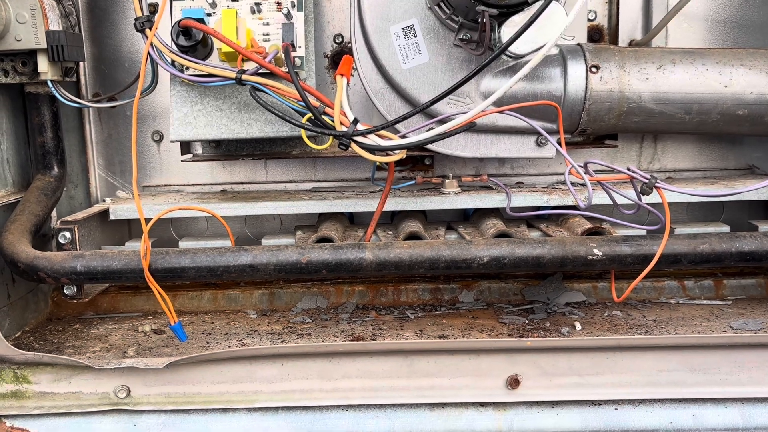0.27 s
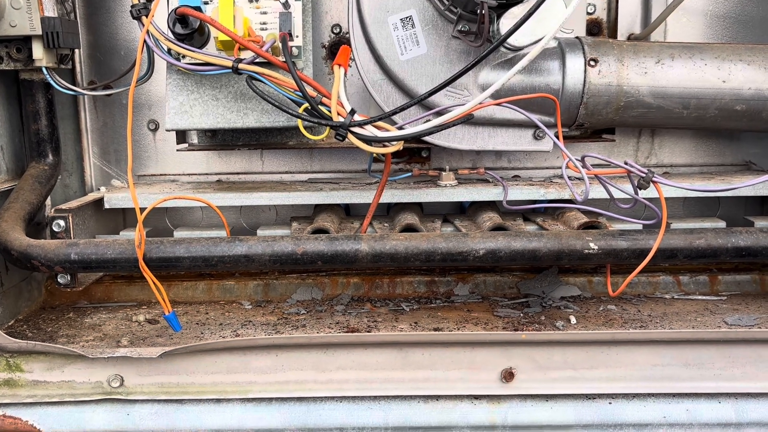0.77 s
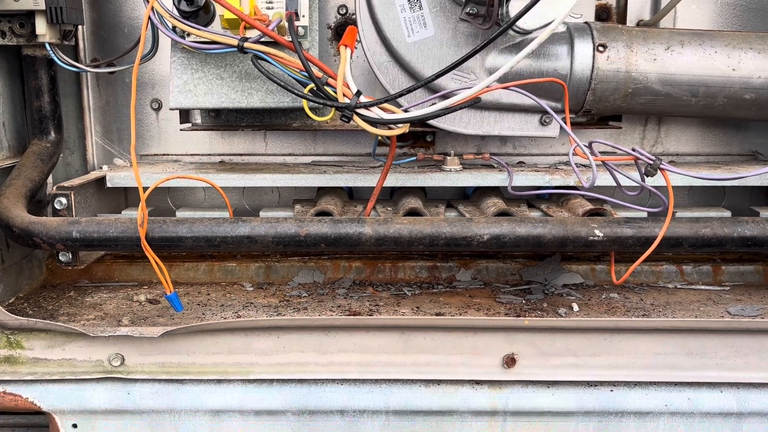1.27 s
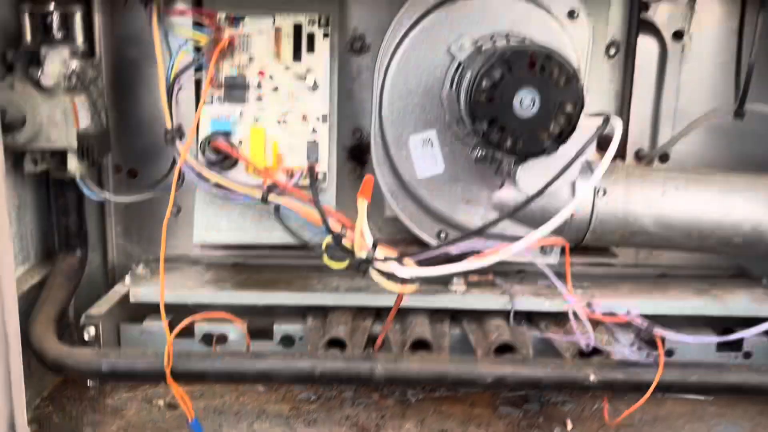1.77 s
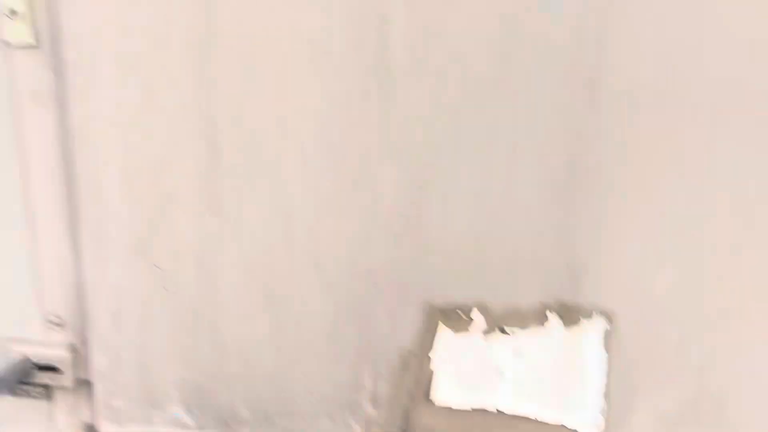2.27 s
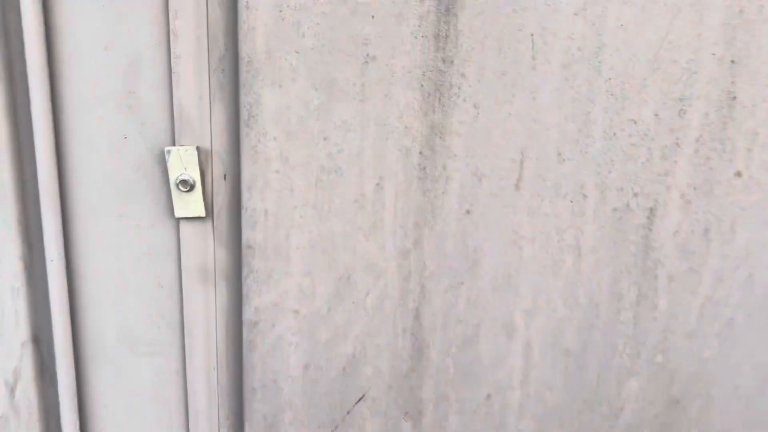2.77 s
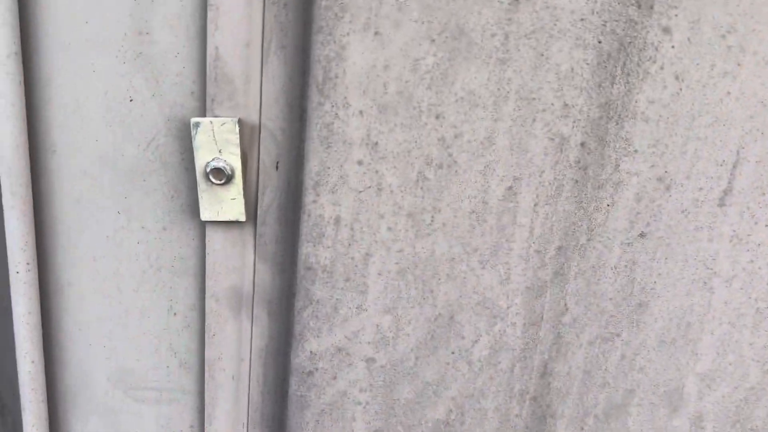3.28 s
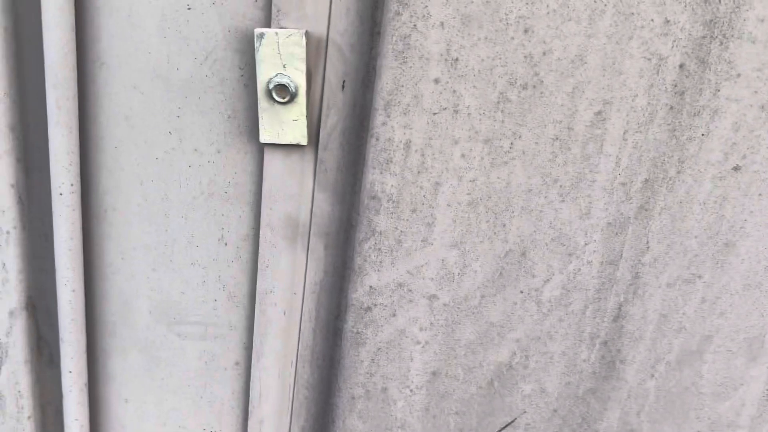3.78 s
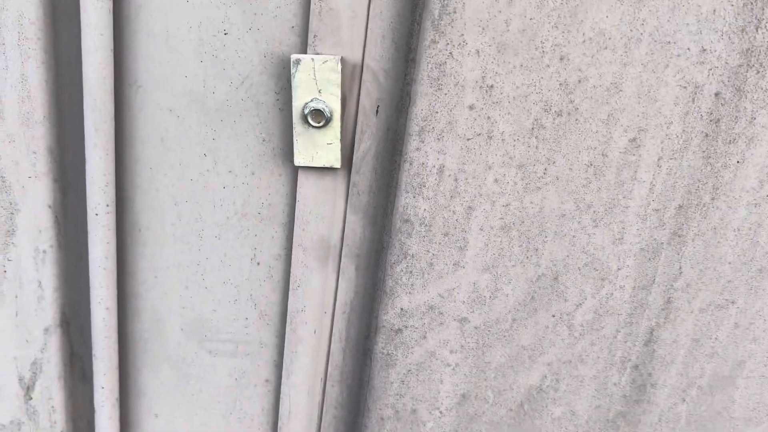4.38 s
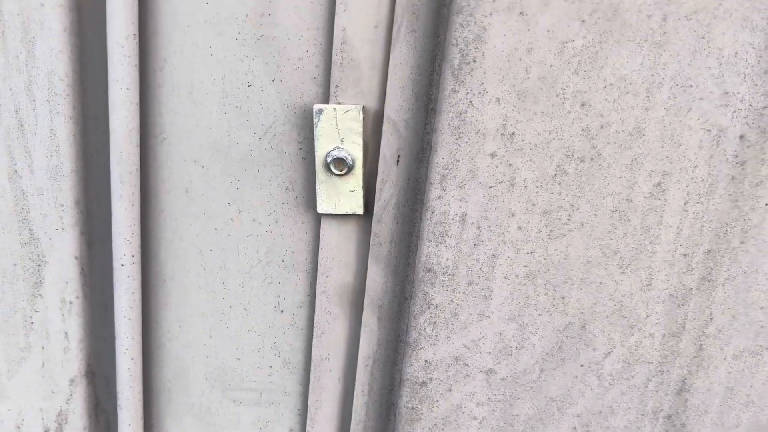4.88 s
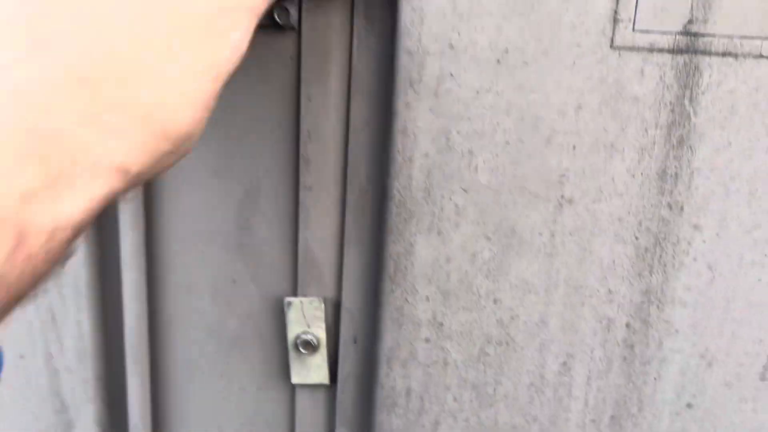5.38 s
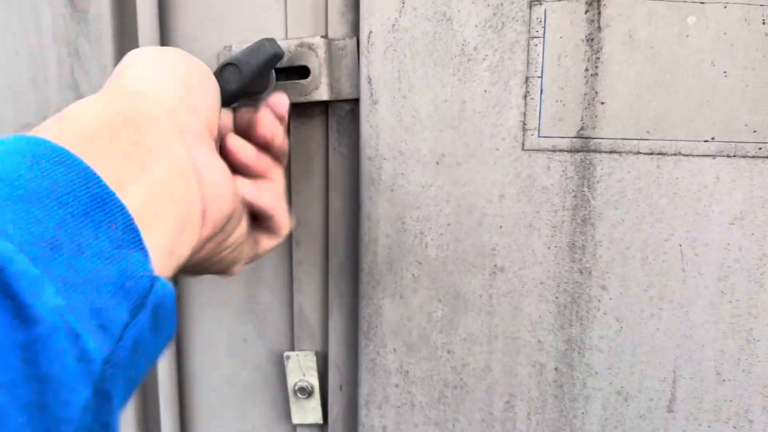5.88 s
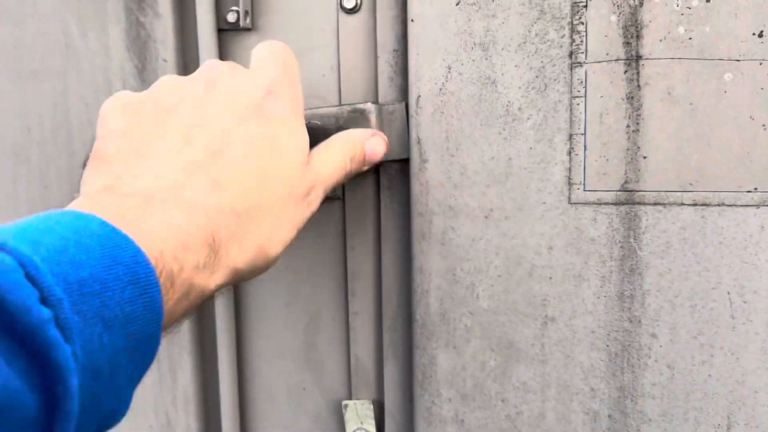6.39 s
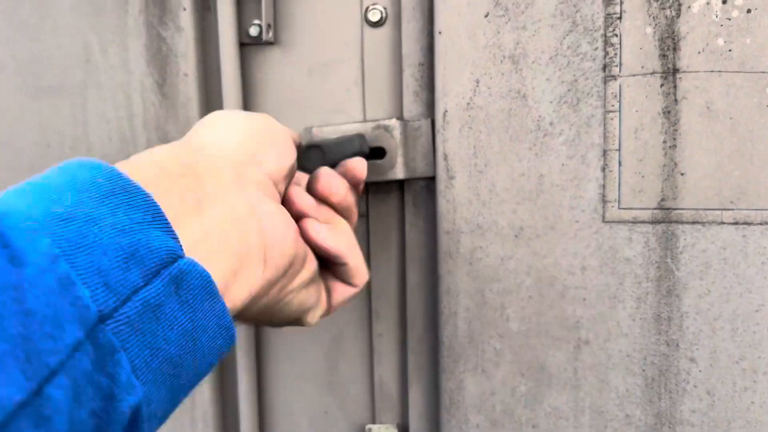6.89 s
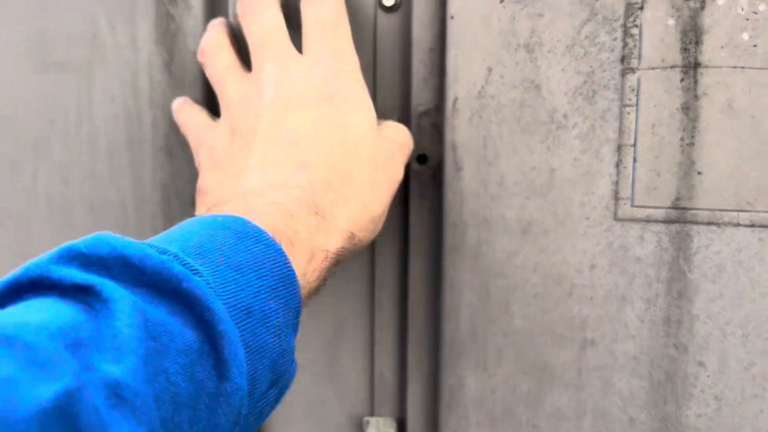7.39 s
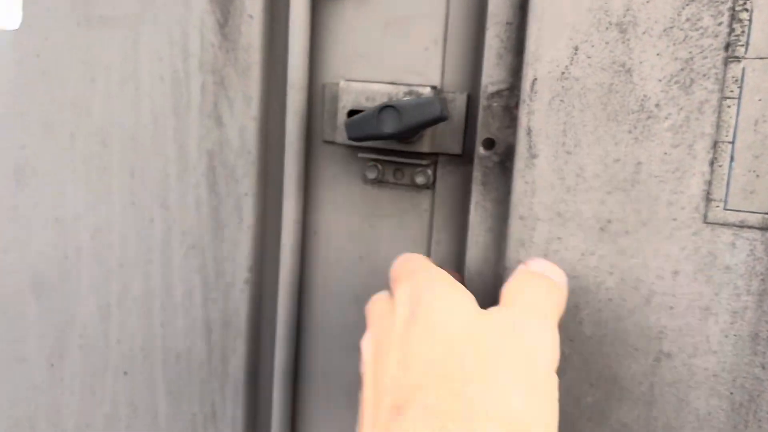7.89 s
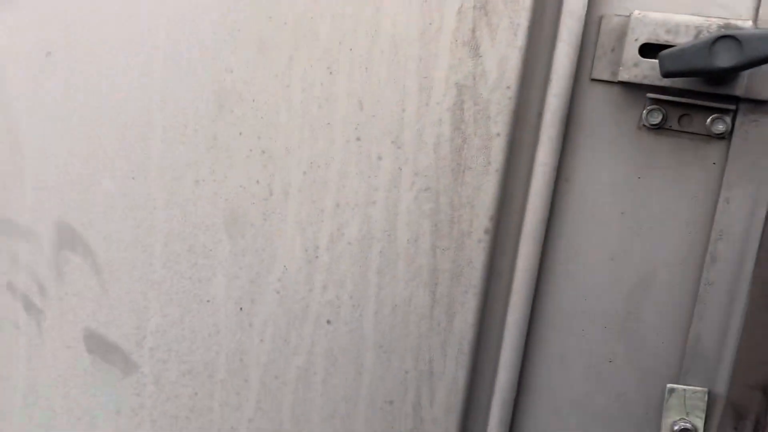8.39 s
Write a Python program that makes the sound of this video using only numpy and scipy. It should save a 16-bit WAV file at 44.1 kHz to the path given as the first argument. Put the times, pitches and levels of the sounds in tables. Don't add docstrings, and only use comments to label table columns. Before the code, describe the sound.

A gas furnace rumbles and roars steadily while a hand works a metal panel latch, with sharp clacks, small squeaks and hollow sheet-metal booms.

```python
import sys
import numpy as np
from scipy import signal
from scipy.fft import rfft, irfft, next_fast_len
from scipy.io import wavfile
from scipy.ndimage import uniform_filter1d, map_coordinates

SR = 44100
rng = np.random.default_rng(int(sys.argv[2]) if len(sys.argv) > 2 else 0)


def dump(signal):
    limited = np.clip(np.atleast_2d(signal).T, -1, 1)
    pcm = np.round(limited * 32767).astype(np.int16)
    wavfile.write(sys.argv[1], SR, pcm)


def natural_amplitude(level_db):
    exponent = np.asarray(level_db, float) / 20
    return 10 ** exponent


N = 381024


def unit(x):
    return x / np.sqrt(np.mean(x ** 2) + 1e-20)


def along(points, hz):
    point_hz, value = np.transpose(points)
    return np.interp(np.log(hz + 1), np.log(point_hz + 1), value)


def wobble(knots_per_s):
    knots = rng.standard_normal(int(N * knots_per_s / SR) + 4)
    return map_coordinates(knots, [np.arange(N) * knots_per_s / SR])


def filtered(x, response):
    size = next_fast_len(x.shape[-1] + 8192)
    spectrum = rfft(x, size) * response(np.fft.rfftfreq(size, 1 / SR))
    return irfft(spectrum, size)[..., :x.shape[-1]]


def resonant(modes):
    def response(hz):
        total = 0
        for k, (centre_hz, width_hz, level_db) in enumerate(modes):
            loss = 1j * hz * width_hz
            total = total + (-1) ** k * natural_amplitude(level_db) * loss / (centre_hz ** 2 - hz ** 2 + loss)
        return total
    return response


def above_400(hz):
    return 1 / (1 + (400 / (hz + 1)) ** 4)


# centre_hz, likeness (0-1)
LIKENESS = [(60, .982), (300, .962), (700, .8), (1500, .58), (2400, .85), (4000, .83), (5500, .6),
            (6300, .95)]


def rush(response, patchy_db):
    pair = rng.standard_normal((2, N))
    if patchy_db:
        z = signal.stft(pair, nperseg=512)[2]
        field = uniform_filter1d(rng.standard_normal(z.shape[1:]), size=5, axis=0)
        field = uniform_filter1d(field, size=12, axis=1)
        pair = signal.istft(z * natural_amplitude(patchy_db * unit(field)), nperseg=512)[1][:, :N]

    def mid_side(hz):
        turn = np.arccos(np.clip(along(LIKENESS, hz), 0, 1)) / 2
        return response(hz) * [np.cos(turn), np.sin(turn)]
    mid, side = filtered(pair, mid_side)
    return unit(np.array([mid + side, mid - side]))


def add(track, start_s, sound, pan_db):
    i = round(start_s * SR)
    track[:, i:i + len(sound)] += natural_amplitude([[pan_db / 2], [-pan_db / 2]]) * sound[:N - i]


# hz, level_db (per Hz)
FLAME = [(12, -56), (20, -43), (41, -16), (59, -2.5), (108, -4.5), (125, -4.5), (146, -15), (180, -11.5),
         (230, -10.5), (400, -120)]


def flames(fire_db, flutter):
    noise = rush(lambda hz: natural_amplitude(along(FLAME, hz)), patchy_db=0)
    swell = np.sqrt(abs(uniform_filter1d((noise ** 2).mean(axis=0), size=5000)) + .05)
    full_fire_db = -15
    return natural_amplitude(full_fire_db + fire_db + .9 * flutter) * unit(noise / swell ** .45)


# centre_hz, width_hz, level_db
FLUE = [(197.4, 29.7, -1.5), (264.6, 50, -3.5), (311.2, 43.5, -4.5), (422.3, 57, -13.5), (586, 25.5, -14.5)]


def flue_roar(fire_db, far_db, flutter):
    roar_db = -22 + 0.13 * fire_db + 0.16 * far_db
    noise = rush(lambda hz: resonant(FLUE)(hz) / (1 + (hz / 800) ** 4), patchy_db=1.06)
    return natural_amplitude(roar_db + 0.37 * flutter) * noise


# centre_hz, width_hz, level_db
TUBES = [(475, 160, -1.5), (606, 32, 0), (652, 27, -1.5), (810, 79, -4), (870, 22.4, 0.5), (966, 20, -2.5),
         (1005, 21, -6.5), (1250, 97, -5), (1458, 47, -7.5), (1820, 150, -14), (2550, 300, -16),
         (4500, 200, -16)]
# centre_hz, width_hz, level_db
CASING = [(456, 27, 5), (583, 63, 0), (686, 52, -3.5), (768, 47, -6), (894, 26, -6), (1048, 42, -6.5),
          (1216, 56, -6.5), (1494, 93, -11.5), (1850, 220, -16), (2620, 200, -15)]


def cabinet(far_db, direct):
    tubes = rush(lambda hz: abs(resonant(TUBES)(hz)) ** 1.42 * above_400(hz), patchy_db=0)
    casing = rush(lambda hz: abs(resonant(CASING)(hz)) ** 1.27 * above_400(hz), patchy_db=0)
    level_db, shut_db = -31.5 + 0.64 * far_db, -4
    return natural_amplitude(level_db) * (np.sqrt(direct) * tubes + natural_amplitude(shut_db) * np.sqrt(1 - direct) * casing)


# hz, level_db (per Hz)
HISS = [(300, -25), (700, -3.5), (1500, 8.5), (2100, 5.5), (3500, 1), (5500, -2), (9000, -1.5),
        (11500, -3.5), (12500, -6.5), (14000, -14.5), (15700, -16)]


def gas_hiss(far_db):
    noise = rush(lambda hz: natural_amplitude(along(HISS, hz)), patchy_db=1.3)
    return natural_amplitude(-38.5 + far_db + 0.56 * wobble(7.3)) * noise


# centre_hz, width_hz, level_db
WHINE = [(2410, 120, -1), (2630, 93, 0)]


def fan_whine():
    turn_s, turn_lasts_s = 1.68, 0.05
    facing = 1 / (1 + np.exp(np.clip((np.arange(N) / SR - turn_s) / turn_lasts_s, -50, 50)))
    return natural_amplitude(-48.5) * facing * rush(lambda hz: abs(resonant(WHINE)(hz)) ** 2, patchy_db=2)


# time_s, cabinet_distance_m, direct_share (0-1)
STANCE = [(0, 0.97, 1), (1.7, 0.89, 0.83), (2.05, 0.97, 0.35), (2.4, 1.28, 0.16), (3.0, 1.3, 0.06),
          (4.2, 1.41, 0.04), (5.2, 1.36, 0.07), (6.0, 1.63, 0.1), (7.4, 1.57, 0.06), (8.1, 1.68, 0.26),
          (8.3, 2.57, 0.47), (8.64, 2.2, 0.54)]
# time_s, level_db (re full fire)
FIRE = [(0, -2.5), (1.3, -3), (1.97, -4), (2.24, 1), (2.4, -6), (2.81, -10), (3.4, -6.5), (4.3, -9.5),
        (5.3, -5.5), (5.51, -10), (6.15, -6.5), (6.5, -5.5), (6.88, -7.5), (7.25, -1), (7.4, -1.5),
        (7.55, -15.5), (8.06, -17.5), (8.64, -18.5)]


def furnace():
    now_s = np.arange(N) / SR
    time_s, distance_m, direct_share = np.transpose(STANCE)
    far_db = -20 * np.log10(np.maximum(np.interp(now_s, time_s, distance_m), .1))
    direct = np.clip(np.interp(now_s, time_s, direct_share), 0, 1)
    fire_db = np.interp(now_s, *np.transpose(FIRE))
    flutter = wobble(7)
    burning = flames(fire_db, flutter) + flue_roar(fire_db, far_db, flutter)
    return burning + cabinet(far_db, direct) + gas_hiss(far_db) + fan_whine()


# start_s, peak_db, t60_s, body_db, edge_db
KNOCKS = [(3.0385, -31.5, 0.044, 7.5, 1.5), (3.58, -30, 0.06, -20, -21), (4.3261, -18, 0.16, -27, -14),
          (4.779, -9.5, 0.083, -3.5, -15), (4.816, -26, 0.087, -13, -16), (5.5876, -22.5, 0.078, -21, -12),
          (5.609, -28, 0.06, -5, -26), (5.726, -35, 0.17, 7, -5), (6.1418, -29, 0.2, -0.5, -11),
          (6.8372, -29, 0.16, 4, -11), (7.2938, -18.5, 0.073, 1, -13), (7.3024, -20.5, 0.21, 1.5, -10),
          (7.5672, -32, 0.15, -8, -8), (8.0626, -40, 0.12, 11, -24)]
# centre_hz, width_hz, level_db
DOOR_SKIN = [(428, 220, 7), (600, 330, 4.5), (786, 120, 6.5), (938, 47, 2), (1046, 44, 4), (1650, 1140, -6)]
# centre_hz, width_hz, level_db
LATCH = [(1980, 270, 9), (2560, 570, 11), (3500, 890, 9), (4440, 880, 7), (5430, 1500, 2.5),
         (8300, 980, -4)]
# pitch_hz, level_db, t60_s
LATCH_PLATE = [(782, -10, 0.065), (1155, -3, 0.05), (1890, -7, 0.11), (2310, -8, 0.056), (2906, -4, 0.08),
               (3290, -8, 0.063), (4200, -21, 0.076)]


def knocks():
    out, t = np.zeros((2, N)), np.arange(SR // 5) / SR
    edge = resonant([(10500, 8500, -0.24), (13000, 1400, -1.2)])
    pan_db, plate_db = 3, -6
    for start_s, peak_db, t60_s, body_db, edge_db in KNOCKS:
        # response, level dB, decay stretch
        parts = [(resonant(DOOR_SKIN), body_db + 3, 1.5), (resonant(LATCH), 0, 1), (edge, edge_db + 7, .6)]
        for response, part_db, slower in parts:
            rattle = natural_amplitude(-60 * t / (slower * max(t60_s, .01)))
            rattle = rattle + 3 * natural_amplitude(-60 * t / 0.006)
            burst = rng.standard_normal(len(t)) * rattle * (1 - np.exp(-t / 0.00038))
            ring = filtered(burst, lambda hz: response(hz) * abs(response(hz)) ** 0.3)
            add(out, start_s, natural_amplitude(peak_db + part_db + 1.5) * ring / abs(ring).max(), pan_db)
        plate = np.zeros(len(t))
        for pitch_hz, level_db, decay_s in LATCH_PLATE:
            decay = natural_amplitude(level_db + rng.normal(0, 1) - 60 * t / decay_s)
            plate += decay * np.sin(2 * np.pi * pitch_hz * t)
        plate *= 1 - np.exp(-t / .002)
        add(out, start_s, natural_amplitude(peak_db + plate_db + min(body_db, 0)) * plate, pan_db)
    return out


# start_s, peak_db, pitch_hz
FLEXES = [(4.784, -12, 190), (4.801, -10, 135), (4.873, -7.5, 82), (4.941, -10, 74), (5.517, -16, 197),
          (5.677, -15, 223), (6.143, -7, 80), (6.447, -6, 135), (6.488, -4.5, 100), (6.617, -15, 61.9),
          (6.655, -9.5, 250), (6.961, -11, 228), (7.101, -8, 138), (7.17, -7.5, 212), (7.221, -16, 196),
          (7.249, -11, 80), (7.285, -10, 121), (7.303, -6, 105), (7.346, -8, 93), (7.375, -9.5, 162),
          (7.418, -14, 79.4)]
# start_s, peak_db, pitch_hz
TAPS = [(1.603, -14.5, 830), (1.618, -21, 880), (3.039, -21, 543), (3.041, -22, 1100), (5.491, -20, 790),
        (5.528, -22, 700), (5.752, -14, 453), (5.934, -24, 850), (6.258, -23, 590), (6.836, -20.5, 850),
        (7.103, -10.5, 328), (7.139, -13.5, 400), (7.174, -12.5, 364), (7.304, -10, 340), (8.055, -23, 614),
        (8.089, -25, 850)]


def flexing():
    out, t = np.zeros((2, N)), np.arange(SR // 8) / SR
    for start_s, peak_db, pitch_hz in FLEXES + TAPS:
        cycles = pitch_hz * t
        swell = 1.63 * cycles * np.exp(-1.4 * cycles)
        add(out, start_s, -natural_amplitude(peak_db + 7.0) * swell * np.sin(2 * np.pi * cycles), pan_db=1.0)
    return out


# start_s, length_s, first_slip_hz, last_slip_hz, level_db
WHISTLES = [(3.321, 0.0075, 8300, 9550, -10), (3.3275, 0.0055, 11840, 13100, -5),
            (3.334, 0.0083, 12600, 13200, -22), (3.978, .01, 15400, 15600, -23),
            (4.327, 0.022, 1425, 1214, -17.5), (6.779, .008, 15200, 15500, -30),
            (6.853, 0.003, 9240, 10300, -12)]
BUZZES = [(3.323, 0.009, 4500, 4900, -17), (3.327, 0.018, 4750, 4940, -36),
          (4.318, 0.0058, 1980, 2000, -9.5), (5.588, 0.0063, 2880, 2800, -23)]
CHIRPS = [(4.316, 0.017, 2024, 2104, -18.5), (4.321, 0.0086, 2030, 1485, -17.5)]


def squeaks():
    out = np.zeros((2, N))
    edge_hz, thick_hz = 10400, 2440
    rows = [(*r, r[-2]) for r in WHISTLES]
    rows += [(*r, edge_hz) for r in BUZZES] + [(*r, thick_hz) for r in CHIRPS]
    for start_s, length_s, first_hz, last_hz, level_db, top_hz in rows:
        u = np.arange(int(3 * length_s * SR)) / (length_s * SR)
        slip_hz = first_hz + (last_hz - first_hz) * (1 - np.exp(-u / .4))
        turns = np.cumsum(slip_hz * (1 + .09 * rng.standard_normal(len(u)))) / SR
        k = np.arange(1, 12)[:, None]
        size = natural_amplitude(-11 * np.log2(k * slip_hz / top_hz) ** 2) * (k * slip_hz < 15800)
        grip = unit(uniform_filter1d(rng.standard_normal(size.shape), size=60))
        size = size * natural_amplitude(4 * grip)
        tone = (size * np.sin(2 * np.pi * k * turns + k * k)).sum(axis=0)
        swell = (1 - np.exp(-u / 0.34)) * np.exp(-1.4 * u ** 2)
        add(out, start_s, natural_amplitude(level_db) * unit(tone) * swell, pan_db=3.0)
    return out


# start_s, length_s, level_db, centre_hz, breadth_octaves
SCUFFS = [(3.539, 0.053, -38.5, 12000, 2.5), (3.97, .04, -42, 12000, 1.6), (4.76, 0.025, -27, 5000, 4.2),
          (4.76, 0.046, -32, 11500, .4), (4.814, .007, -30, 9000, 0.27), (4.322, 0.014, -21, 9000, 1.6),
          (5.72, 0.046, -41.5, 2620, .14), (6.13, 0.042, -41, 4500, 0.82), (8.153, 0.58, -46, 1510, 0.1),
          (1.548, 0.68, -39.5, 960, 0.035), (6.851, 0.0086, -24, 10600, 0.24),
          (7.278, 0.042, -32, 8000, 1.2), (8.049, .05, -42.5, 1500, 0.84)]
# start_s, length_s, level_db, centre_hz, breadth_octaves
SLEEVE = [(5.362, 0.22, -43.5, 4500, 0.2), (5.376, 0.21, -42.5, 7300, 0.78),
          (5.382, 0.14, -44.5, 2800, 0.56)]


def scuffs():
    out = np.zeros((2, N))
    # pan_db, grit_db
    rows = [(*r, 0.5, 1.1) for r in SCUFFS] + [(*r, 11.5, 4) for r in SLEEVE]
    for start_s, length_s, level_db, centre_hz, breadth_octaves, pan_db, grit_db in rows:
        u = np.linspace(0, 1, int(length_s * SR))
        grit = natural_amplitude(grit_db * unit(uniform_filter1d(rng.standard_normal(len(u)), size=90)))

        def band(hz):
            return np.exp(-.5 * (np.log2((hz + 1) / centre_hz) / breadth_octaves) ** 2)
        rub = filtered(rng.standard_normal(len(u)) * grit, band)
        stroke = np.sin(np.pi * u ** (1.2 if length_s < .1 else .75)) ** .65
        add(out, start_s, natural_amplitude(level_db) * unit(rub) * stroke, pan_db)
    return out


def scene():
    return furnace() + knocks() + flexing() + squeaks() + scuffs()


def top_cut(x):
    return signal.sosfilt(signal.butter(12, 15810, fs=SR, output="sos"), x)


# hz, lead_rad
LEAD = [(200, 0.2), (1100, -0.86), (1900, -1.15), (2300, -0.9), (3000, 0.75), (4200, 0.45), (5500, -0.52),
        (6300, -0.14)]
# hz, left_minus_right_db
LEAN = [(60, 1), (150, -1), (380, 0), (950, 1), (2380, 1), (5980, 3), (15000, 0.0)]


def record(dry):
    sides = np.array([[1], [-1]])

    def treble(hz):
        return np.clip((hz - 6000) / 500, 0, 1)

    def shaded(hz):
        return natural_amplitude(sides * along(LEAN, hz) / 2) * np.exp(.5j * sides * along(LEAD, hz))

    def late(hz):
        lag = 2 * np.pi * (hz - 7050) / 5750
        return np.exp(-.5j * sides * (lag - 0.13 * np.sin(2 * lag) - 0.11 * np.sin(lag)))
    low = filtered(dry, lambda hz: (1 - treble(hz)) * shaded(hz))
    shared = dry.mean(axis=0) * np.ones((2, 1))
    high = filtered(shared, lambda hz: treble(hz) * late(hz) * (hz < 15800))
    held = (low + high) / (1 + abs(low + high) ** 8) ** .125
    return top_cut(held)


dry = scene()
out = record(dry)
dump(out)
```